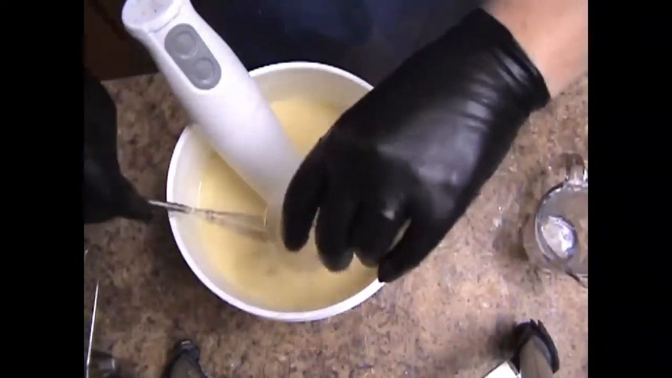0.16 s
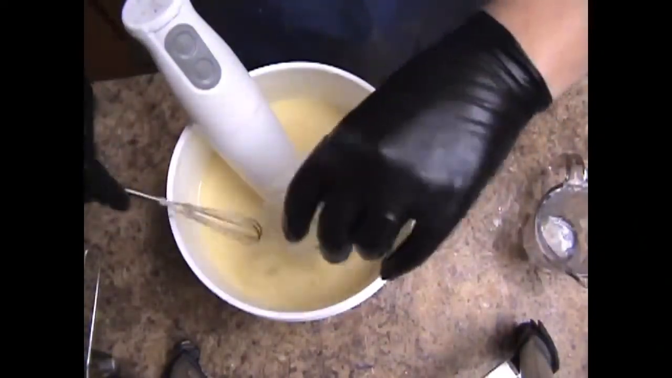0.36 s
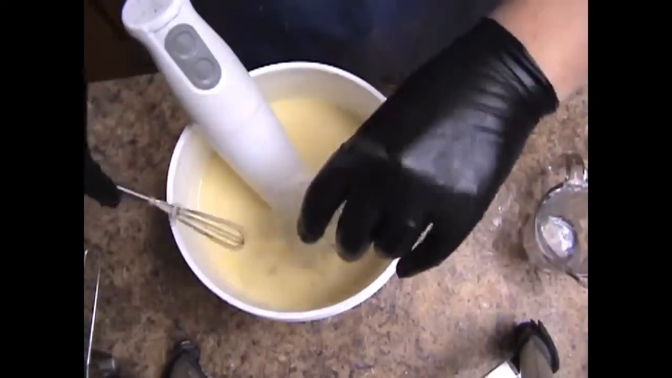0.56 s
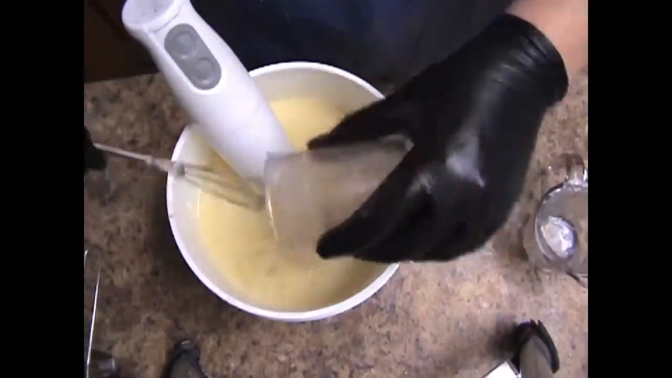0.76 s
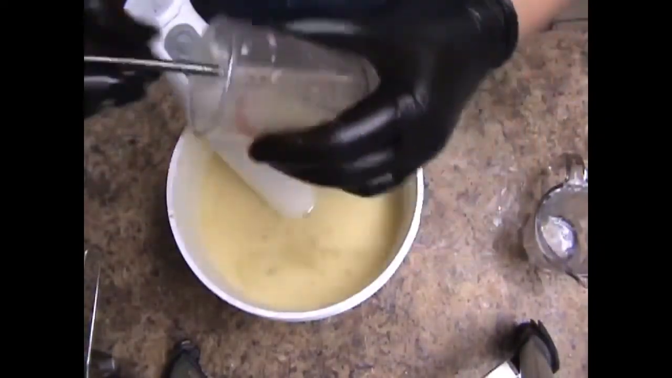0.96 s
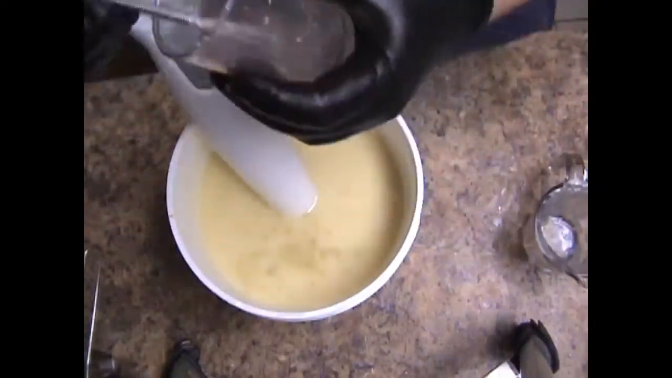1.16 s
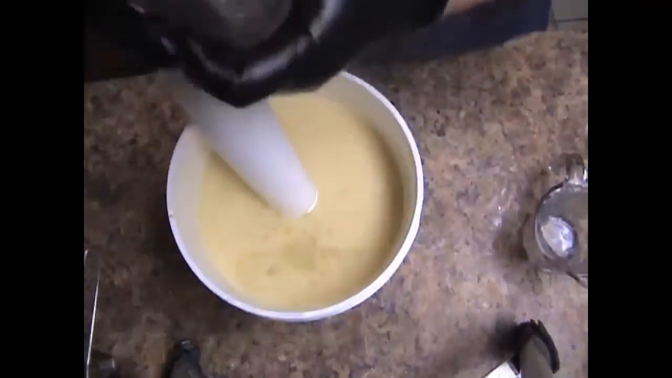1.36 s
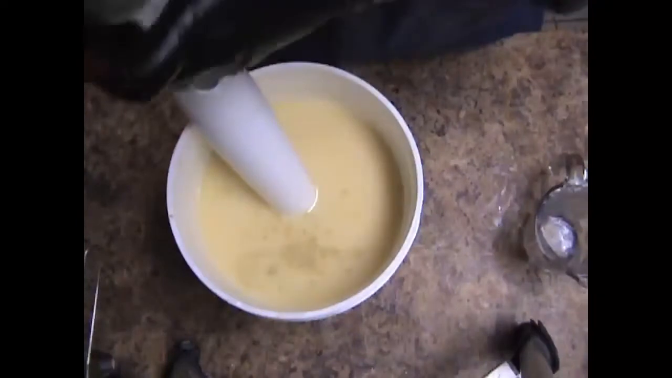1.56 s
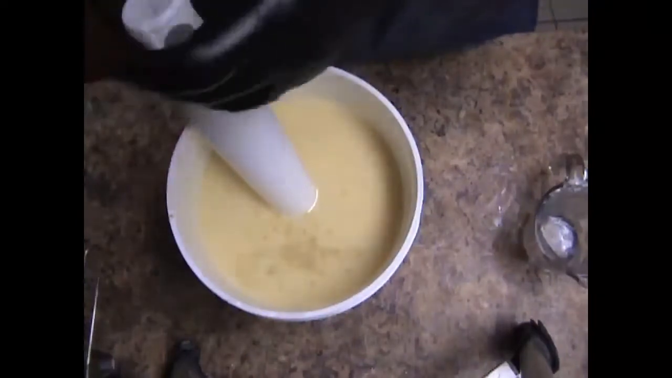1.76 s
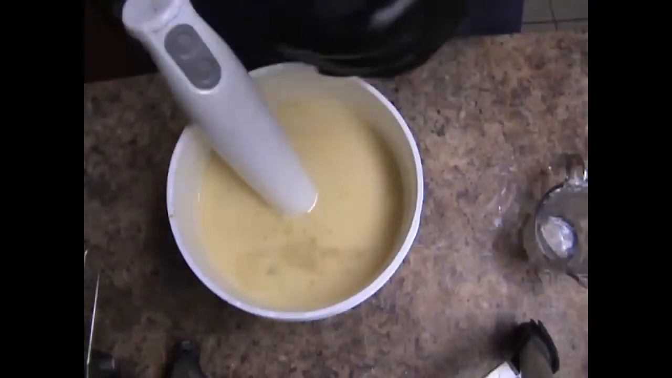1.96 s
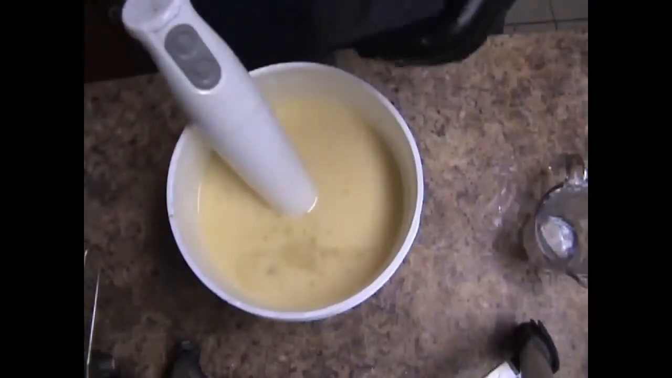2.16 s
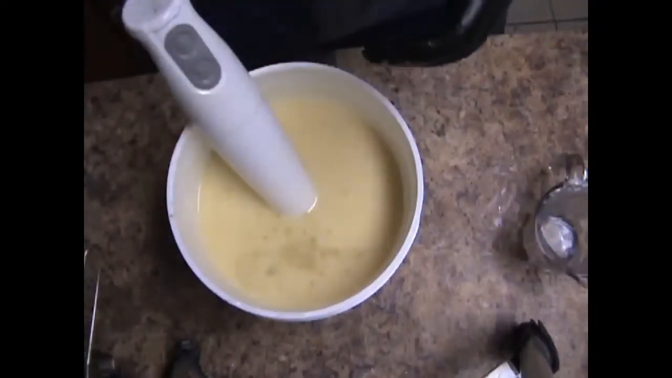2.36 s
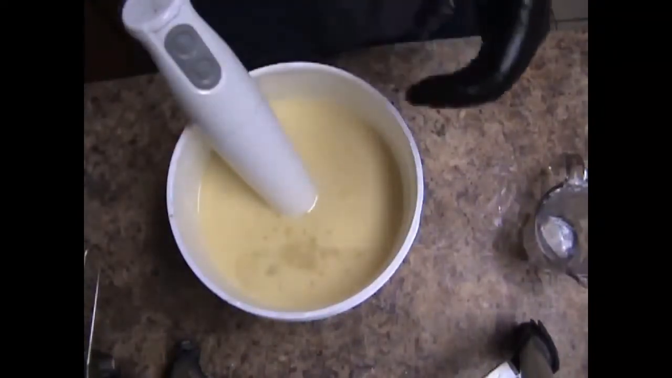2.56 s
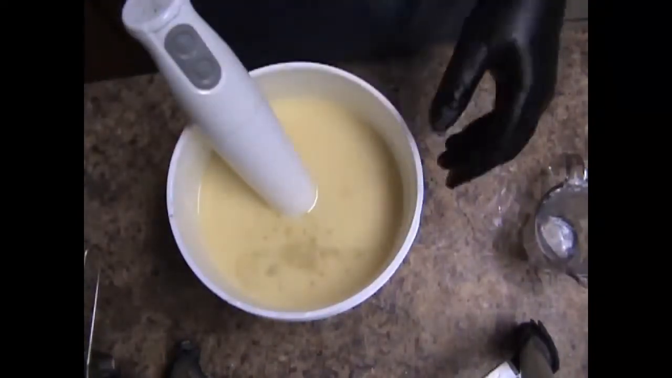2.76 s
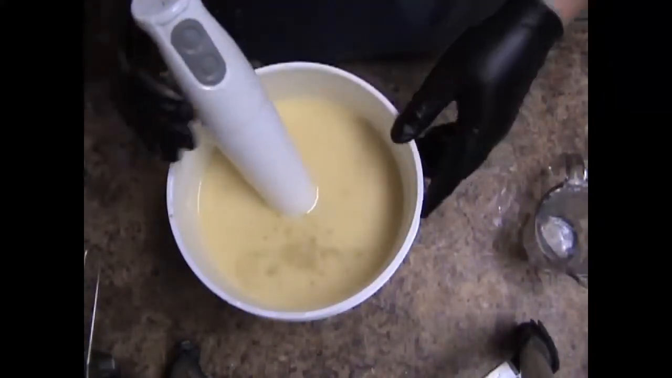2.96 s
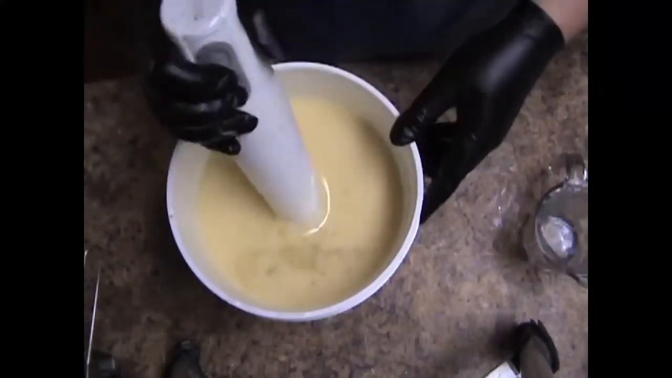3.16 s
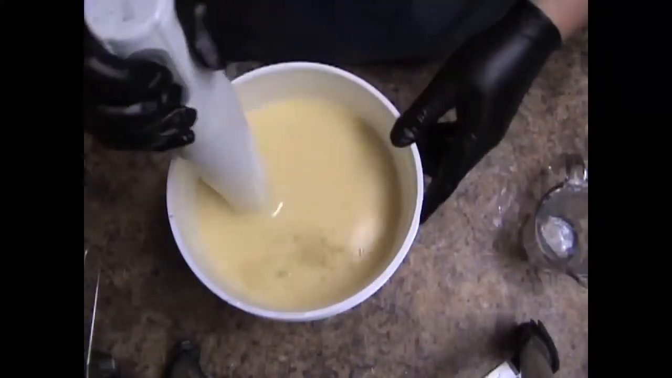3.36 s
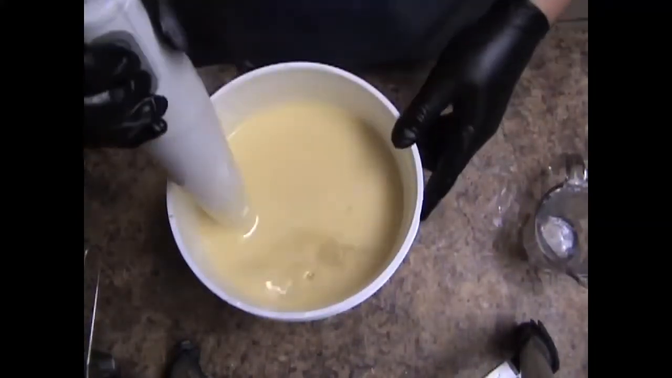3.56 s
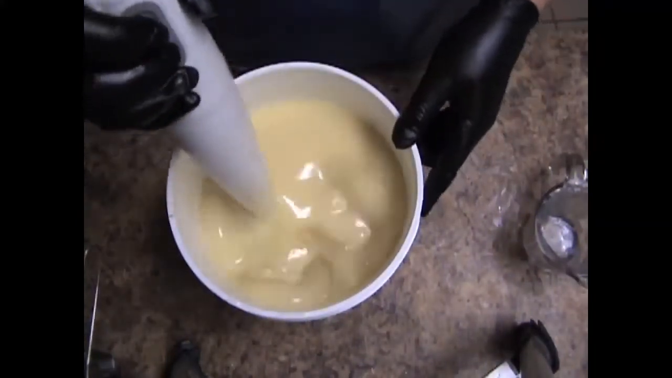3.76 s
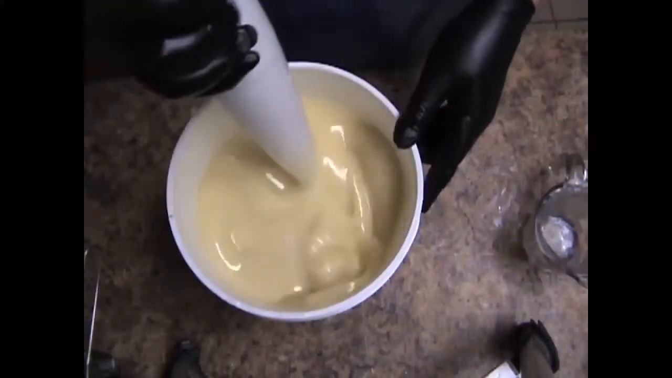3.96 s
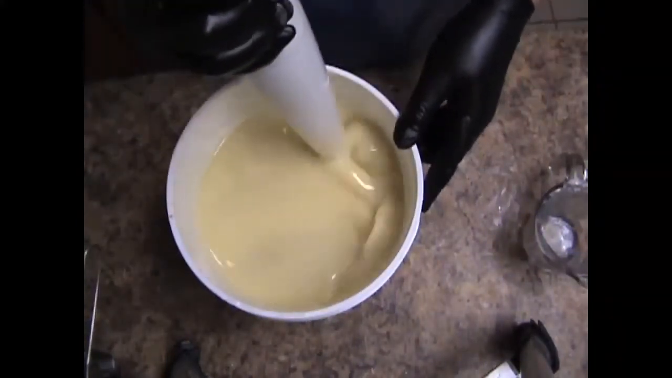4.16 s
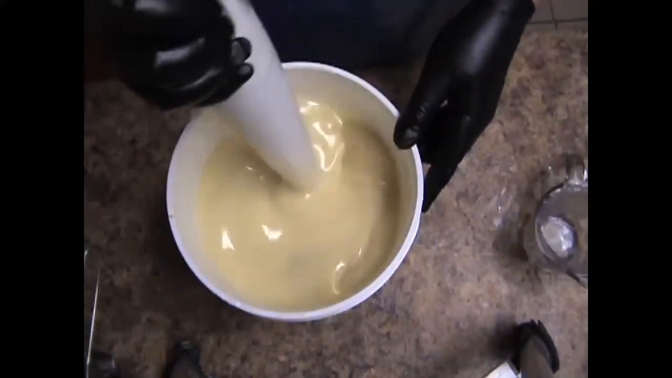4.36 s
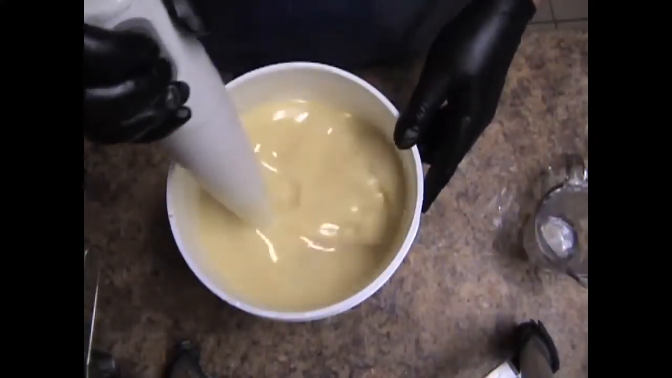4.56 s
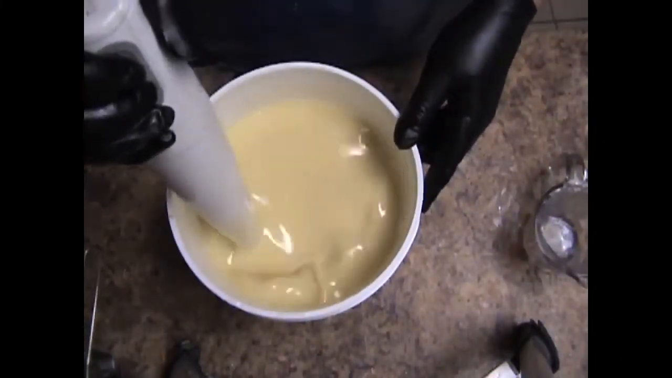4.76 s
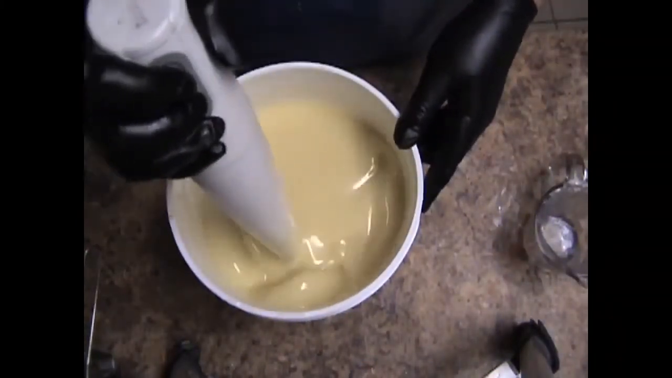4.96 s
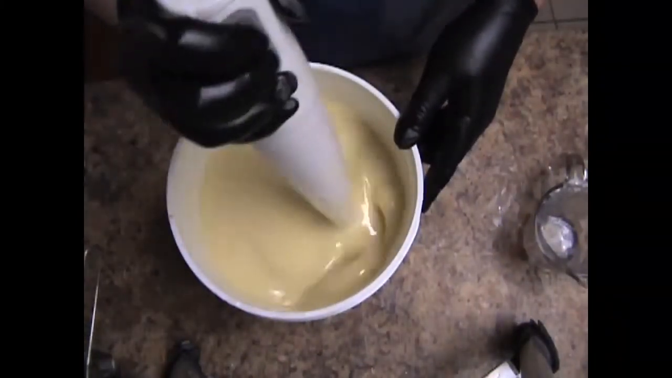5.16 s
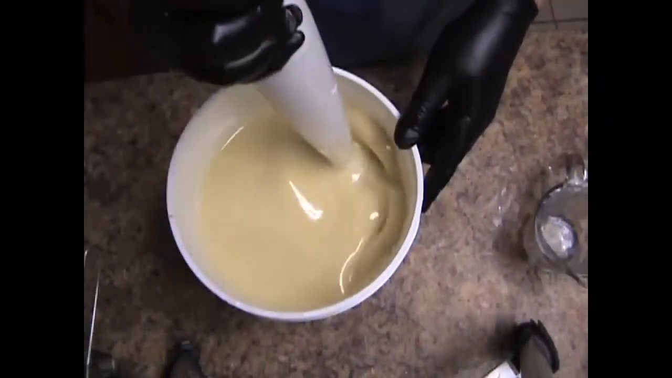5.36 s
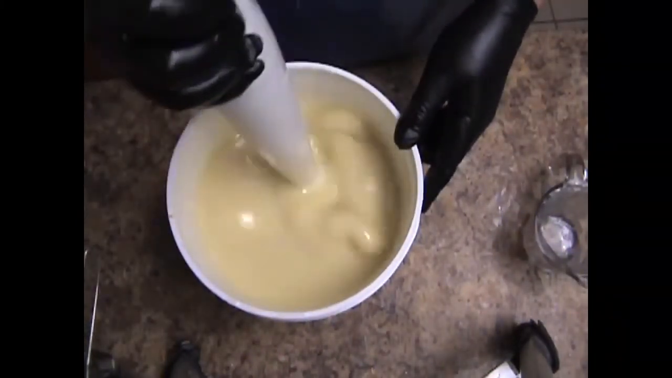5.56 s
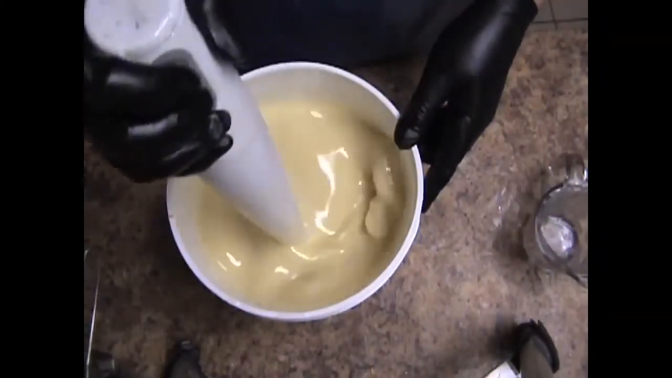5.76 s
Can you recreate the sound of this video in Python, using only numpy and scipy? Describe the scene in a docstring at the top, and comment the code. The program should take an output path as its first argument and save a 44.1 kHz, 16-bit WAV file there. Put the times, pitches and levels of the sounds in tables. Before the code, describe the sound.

A wire whisk taps and clinks on a plastic cup, the cup thuds down, then a stick blender whirs continuously through thick batter.

```python
"""A stick blender runs up and whirs in a bowl of batter: tones locked to its shaft, noise gated by shaft and mains,
and knocks of the coupling. Before it, a wire whisk is rapped on a plastic cup and clinks, and the cup is set
down on the counter: each blow is a set of dying notes with a burst of noise and a kitchen echo.
Gloved hands rustle, as shaped noise, in a quiet kitchen with a humming appliance, heard at two microphone ports."""
import sys
import numpy as np
from scipy import signal
from scipy.fft import rfft, irfft, next_fast_len
from scipy.io import wavfile
from scipy.ndimage import uniform_filter1d, map_coordinates

SR = 44100
rng = np.random.default_rng(int(sys.argv[2]) if len(sys.argv) > 2 else 0)


def master(y):
    """Save y as 16-bit WAV."""
    cut = np.clip(np.atleast_2d(y).T, -1, 1)
    pcm = np.round(cut * 32767)  # scale
    wavfile.write(sys.argv[1], SR, pcm.astype(np.int16))


N = 256220
TIME = np.arange(N) / SR  # seconds


def amp(db):
    """Turns decibels into gain."""
    return 10 ** (np.asarray(db) / 20)


def unit(x):
    """Scales a sound to an rms of 1."""
    return x / np.sqrt(np.mean(x ** 2) + 1e-20)


def along(points, hz):
    """Reads (pitch_hz, value) points on a log pitch axis."""
    f, v = np.transpose(points)
    return np.interp(np.log(hz + 1), np.log(f + 1), v)


def curves(rows):
    """Joins the rows of a table into one smooth-running value per sample for each column after the time."""
    s, *columns = np.transpose(rows)
    return [np.interp(TIME, s, column) for column in columns]


def wobble(rate):
    """A smooth random curve with rate random knots a second."""
    knots = rng.standard_normal(int(N * rate / SR) + 4)
    return map_coordinates(knots, [TIME * rate])


def noise(*shape):
    """White noise."""
    return rng.standard_normal(shape)


def filtered(x, response):
    """Multiplies the spectrum of x by a complex response of frequency."""
    n = x.shape[-1]
    m = next_fast_len(n + 8192)
    return irfft(rfft(x, m) * response(np.fft.rfftfreq(m, 1 / SR)), m)[..., :n]


def coloured(x, spectrum):
    """Shapes x with a spectrum and scales it to an rms of 1."""
    return unit(filtered(x, lambda hz: amp(along(spectrum, hz))))


# how alike sound from all around is at the two ports: pitch_hz, likeness (0 to 1)
LIKENESS = [(60, 0.99), (130, 0.94), (290, 0.81), (640, 0.38), (1410, 0.49), (3100, 0.57), (6820, 0.73),
            (15000, 1)]


def diffuse(pair):
    """Mixes two unrelated signals so they are as alike as sound arriving from all around."""
    def mid_and_side(hz):
        turn = np.arccos(np.clip(along(LIKENESS, hz), -1, 1)) / 2
        return np.array([np.cos(turn), np.sin(turn)])
    mid, side = filtered(pair, mid_and_side)
    return np.array([mid + side, mid - side])


def all_around(spectrum):
    """Shaped noise that arrives from all around, at an rms of 1."""
    return unit(diffuse(coloured(noise(2, N), spectrum)))


# how far the left port leads for direct sound: pitch_hz, lead_radians
LEFT_LEAD = [(0, 0), (340, 0.49), (780, 0.99), (3620, 0.39), (5000, 0.45), (7060, 0.037), (15800, 0.0)]


def ports(x):
    """Direct sound reaches the left port ahead in phase."""
    def lead_and_lag(hz):
        half = np.exp(.5j * along(LEFT_LEAD, hz))
        return np.array([half, 1 / half])
    return filtered(x, lead_and_lag)


def ring(modes, t, rough):
    """Struck things ring at several pitches that die away; rough (radians a sample) lets the phase wander."""
    total = np.zeros(len(t))
    for hz, db, t60 in modes:
        drift = rough * np.cumsum(noise(len(t)))
        strength = amp(db + rng.normal(0, 0.77) - 60 * t / t60)  # each blow differs a little
        total += strength * np.sin(2 * np.pi * hz * t + drift)
    return (1 - np.exp(-t / 0.00084)) * total


def crack(spectrum, t, t60):
    """The short burst of noise when two things touch."""
    return coloured(noise(len(t)), spectrum) * amp(-60 * t / t60) * (1 - np.exp(-t / 0.00094))


# how long the kitchen echo takes to fall by 60 dB: pitch_hz, t60_s
ECHO = [(150, 0.21), (600, 0.37), (2000, 0.28), (6000, 0.32), (14000, 0.31)]
AHEAD, ECHO_START = 64, 320  # samples of silence before a blow, and from the same start to its echo


def add(out, s, blow, pan_db, room_db, low_hz):
    """Places one blow, weakened below low_hz, with a fresh kitchen echo in the broad colour of the blow."""
    blow = filtered(np.pad(blow, (AHEAD, 0)), lambda hz: (1j * hz / (low_hz + 1j * hz)) ** 3)
    n = len(blow)
    hz, t, z = signal.stft(noise(2, n), SR, nperseg=256)
    fading = z * amp(-60 * t / along(ECHO, hz)[:, None])
    tail = signal.istft(fading, SR, nperseg=256)[1]
    tail = diffuse(tail) / np.linalg.norm(tail[0])
    tail = np.pad(tail, ((0, 0), (ECHO_START, 0)))[:, :n]
    power = uniform_filter1d(np.abs(rfft(blow)) ** 2, size=n // 85)
    echo = irfft(rfft(tail, n) * np.sqrt(np.abs(power)), n)
    left_db = pan_db / 2 - .9  # so a pan of 1.8 dB is even
    both = ports(blow) * amp([[left_db], [-left_db]]) + amp(room_db) * echo[:, :n]
    k = max(round(s * SR) - AHEAD, 0)
    out[:, k:k + n] += both[:, :out.shape[1] - k]


def blow_time(length_s=.5):
    """An empty two-port track, and the seconds since the start of a blow."""
    return np.zeros((2, N)), np.arange(int(SR * length_s)) / SR


# colour of the still room: pitch_hz, level_db
AIR = [(15, -37), (25, -9), (129, -13), (173, -1.5), (289, -4.5), (349, 6), (482, 2), (703, -14), (782, -1),
       (1240, -15), (2490, -21), (3720, -32), (15500, -14)]


def room_air():
    """The still room is a faint steady noise from all around."""
    return amp(-68) * all_around(AIR)


# steady tones of an appliance: pitch_hz, level_db (before 1.5 dB is added)
HUM = [(59.2, -66.5), (118.4, -70.5), (209.9, -78.5), (296.1, -67.5), (532.9, -74.5)]


def appliance_hum():
    """A running appliance hums at a few steady pitches whose levels drift."""
    lines = [amp(db + 1.5 + 1.7 * wobble(2.5)) * np.sin(2 * np.pi * hz * TIME) for hz, db in HUM]
    lines[1] *= 1 + 0.53 * np.cos(2 * np.pi * 2.08 * (TIME - 1.54))  # wavers twice a second
    return ports(sum(lines))


def swell(middle_s, length_s, db):
    """A bell-shaped rise and fall in level."""
    return amp(db) * np.exp(-(2 * (TIME - middle_s) / length_s) ** 2)


# hands moving: start_s, gloves_db, sleeves_db
HAND_MOVES = [(0.0, -67, -65), (0.23, -73, -69.5), (0.44, -70, -69), (0.59, -74, -77), (0.77, -70.5, -67.5),
              (1.08, -67.5, -65), (1.25, -64.5, -59.5), (1.47, -61.5, -60.5), (1.71, -65.5, -63),
              (2.26, -65, -60.5), (2.36, -65, -65), (2.46, -75.5, -72), (2.67, -66.5, -70.5),
              (2.79, -63, -62), (2.96, -61, -62), (3.09, -58.5, -59), (3.24, -61, -61.5), (3.39, -69, -67)]
# colour of the rubbing gloves: pitch_hz, level_db
GLOVES = [(1760, -27), (3000, -11), (3540, -4), (4320, 0.5), (9520, -8), (14500, -22), (15500, -32)]
# colour of the rubbing sleeves: pitch_hz, level_db
SLEEVES = [(350, -45), (600, -9.5), (905, -13.5), (1260, -6), (3000, -12.5), (3900, -25), (6600, -120)]
# one brighter swish of a glove: middle_s, length_s, level_db
SWISH = (1.62, 0.038, -54.5)


def rustling_hands():
    """Rubbing gloves and sleeves make shaped noise whose level flutters."""
    gloves_db, sleeves_db = curves(HAND_MOVES)
    gloves = (amp(gloves_db + 1.17 * wobble(60)) + swell(*SWISH)) * all_around(GLOVES)
    sleeves = amp(sleeves_db + 1.34 * wobble(39.57)) * all_around(SLEEVES)
    return gloves + sleeves


# low bumps through the counter: middle_s, length_s, level_db
BUMPS = [(.07, 0.25, -77), (.58, 0.11, -76), (1.69, 0.13, -71), (3.05, .04, -62), (3.093, .04, -55),
         (3.155, 0.063, -60), (3.24, .06, -67), (5.054, 0.095, -58)]


def counter_sounds():
    """Low bumps come through the counter, and scuffing on it is dull noise of uneven level."""
    low = all_around([(15, -11), (30, -8), (90, -6), (250, -21), (16000, -120)])
    bumps = sum(swell(*row) for row in BUMPS) * low
    dull = all_around([(60, -16), (150, 0.5), (450, -1.0), (1200, -12), (16000, -120)])
    scuff_db = -65 + 1.9 * wobble(50) + 9 * np.tanh(wobble(11))
    return bumps + amp(scuff_db) * dull


# whisk clinks: start_s, contact_db, hollow_db, low_wires_db, high_wires_db (before the gains below)
CLINKS = [(1.0281, -23, -24.5, -29, -43), (1.043, -11, -35, -23.5, -15), (1.069, -26, -38, -31, -18),
          (1.107, -38, -66, -42.5, -49), (1.1965, -12.5, -53, -24, -14), (1.264, -51, -55, -43, -70),
          (1.2984, -41, -62, -41, -62), (1.3366, -11.5, -44, -24, -16.5), (1.412, -44, -74, -46, -62)]
# ringing wires of the whisk, the first three being the low ones: pitch_hz, level_db, t60_s
WIRES = [(2420, -9.5, 0.082), (4146, -1.5, 0.034), (5810, -6, 0.074), (7020, -14, 0.039),
         (7450, -13, 0.038), (8890, 3, 0.018), (9400, -4, .02), (10440, -8, 0.037), (10760, -3, 0.024)]
# hollow note under a clink: pitch_hz, level_db, t60_s
HOLLOW = [(908, 5, 0.053), (850, -27, .05)]
# colour of the contact: pitch_hz, level_db
CLINK_NOISE = [(180, -49), (300, -6.5), (849, -17), (1700, -26), (2320, -9.5), (5850, -0.5), (7750, -4),
               (10800, -4), (15500, -35)]


def whisk_clinks():
    """The thin wires ring high and briefly over a contact burst and a hollow note."""
    out, t = blow_time()
    # an earlier clink is still dying away at the start
    dying = [(hz, db, 0.99 * t60) for hz, db, t60 in WIRES]
    add(out, 0, amp(-51) * ring(dying, t, 0.044), 0, room_db=2.5, low_hz=188)
    for s, db, hollow_db, low_db, high_db in CLINKS:
        blow = amp(low_db - 3.5) * ring(WIRES[:3], t, 0.081)
        blow += amp(high_db - 8) * ring(WIRES[3:], t, 0.15)
        blow += amp(db - 4) * crack(CLINK_NOISE, t, 0.01)
        blow += amp(hollow_db) * ring(HOLLOW, t, 0.039)
        add(out, s, blow, pan_db=2, room_db=-19, low_hz=200)
    return out


# small contacts of gloves on bowl and handle, the last (3.387 s) being the click of the blender's switch:
# start_s, level_db (before the gains below), pan_db, pitch_hz
TOUCHES = [(.12, -50, -1, 3000), (0.929, -49, 1, 3000), (1.005, -47, 1, 4000), (1.43, -40, 0, 6500),
           (2.175, -33, 8, 5600), (2.841, -41, -2, 4100), (2.909, -33, -3, 1160), (2.921, -34.5, 3, 695),
           (3.014, -37, 2, 384), (3.016, -34.5, -1, 1200), (3.045, -53, -1, 300), (3.08, -38.5, 0, 278),
           (3.097, -41, 2, 220), (3.175, -54, 1, 220), (3.387, -32, 3, 393)]


def small_touches():
    """A light contact is a tick of noise around one pitch with a brief note at it."""
    out, t = blow_time(.2)
    for s, db, pan_db, hz in TOUCHES:
        around = [(hz / 4, -25), (hz, 0), (hz * 1.34, -6), (hz * 4, -30), (80000, -70)]
        blow = amp(db - 3) * crack(around, t, 0.009 + 5 / hz)
        blow += amp(db - 0.5) * ring([(hz, 0, 5 / hz)], t, 0.029)
        add(out, s, blow, pan_db, room_db=-5, low_hz=71)
    return out


# whisk on cup: start_s, cup_db (before the gains below), pan_db, cup_air_db, handle_db, counter_db
RAPS = [(.396, -11, 3, -36.5, -57, -73), (.41, -20, 1, -35.5, -52, -44), (.547, -14.5, 3.5, -38, -62, -45),
        (.56, -24.5, 2, -39, -51.5, -50), (.692, -11.5, 3.5, -67, -68, -39), (.708, -30, 0, -44, -66, -43)]
# ringing wall of the cup: pitch_hz, level_db, t60_s
CUP = [(1232, -5.5, 0.067), (1932, 1, 0.047), (2320, 1.5, 0.028), (2750, -5.5, 0.032), (3340, -1.5, 0.034),
       (4280, -15, 0.033), (7300, -2, 0.017)]
# colour of the contact: pitch_hz, level_db
RAP_NOISE = [(35, -48), (60, -27), (423, -5), (1230, -11.5), (1520, -24), (1960, -2), (2840, -10.5),
             (3270, -13), (3840, -16.5), (4220, -8.5), (7030, -19.5), (9080, -16), (15500, -40)]
# ringing air in the cup: pitch_hz, level_db, t60_s
CUP_AIR = [(540, -4.5, 0.34), (494, -6.5, 0.2), (647, -14, 0.24), (759, 2.5, 0.12), (259, -7.5, 0.1)]
# ringing handle: pitch_hz, level_db, t60_s
HANDLE = [(1530, 1, 0.43)]
# low notes of the counter: pitch_hz, level_db, t60_s
SLAB = [(61, -9, 0.28), (95, -4.5, 0.12)]


def whisk_raps():
    """A rap sets the cup wall, its air, the handle and the counter ringing, with a burst at the contact."""
    out, t = blow_time()
    for s, db, pan_db, air_db, handle_db, slab_db in RAPS:
        blow = amp(db - 14) * ring(CUP, t, 0.065)
        blow += amp(db - 4) * crack(RAP_NOISE, t, 0.023)
        blow += amp(air_db) * ring(CUP_AIR, t, 0.052)
        blow += amp(handle_db) * ring(HANDLE, t, 0.064)
        blow += amp(slab_db) * ring(SLAB, t, 0.0044)
        add(out, s, blow, pan_db, room_db=-14, low_hz=30.5)
    return out


# cup on the counter: start_s, level_db (before the gains below), pan_db
SET_DOWN = [(2.294, -8.5, 3.5)]
# ringing counter: pitch_hz, level_db, t60_s
COUNTER = [(477, -5.5, 0.38), (502, -5.5, 0.36), (613, -8, 0.35), (640, -3, 0.16), (800, -22, 0.089),
           (962, -3, 0.11), (1117, 6, 0.051), (1320, 3, 0.07), (1620, -25, 0.076), (1880, -1.5, 0.06),
           (2070, -14, 0.046), (3270, -25, 0.028), (176, -13, 0.099)]
# colour of the thud: pitch_hz, level_db
THUD = [(47, -52), (80, -30), (205, -42), (363, -17), (574, 4.5), (852, -14), (1870, -11), (2380, -13),
        (4500, -29.5), (7280, -33), (15000, -65)]


def cup_set_down():
    """The cup thuds on the counter, which rings on."""
    out, t = blow_time()
    for s, db, pan_db in SET_DOWN:
        blow = amp(db - 14.5) * ring(COUNTER, t, 0.029) + amp(db - 8.5) * crack(THUD, t, 0.052)
        add(out, s, blow, pan_db, room_db=-5, low_hz=201)
    return out


# full running speed in the batter: start_s, turns_per_s
SPEED = [(3.8, 195.6), (4, 195), (4.3, 195.2), (4.45, 195.6), (5, 195.6), (5.6, 195.2), (5.81, 194.5)]
SWITCH_S = 3.4
RUN_UP_S, RUN_UP_SHAPE, START_LAG = .0934, 1.4, 90  # seconds, exponent, turns a second short at the switch


def shaft_turning():
    """The shaft lags full speed at the switch and catches up; gives its angle and its slack (share missing)."""
    since = np.clip(TIME - SWITCH_S, 0, None)
    full, = curves(SPEED)
    speed = full - START_LAG * np.exp(-(since / RUN_UP_S) ** RUN_UP_SHAPE)
    angle = 2 * np.pi * np.cumsum(speed + .5 * wobble(30)) / SR
    return angle, 1 - speed / full


# one row per shaft order (multiple of the shaft speed) from the first; the side tones get 2 dB more:
# own_db (unused where it swells), one_beat_below_db, one_beat_above_db, two_beats_above_db
ORDERS = [(-61, -75, -58, -54), (-38, -67, -45, -52), (-41, -52, -52, -58), (-36, -55, -60, -60),
          (-52, -62, -61, -54), (-48, -66, -49, -53), (-37, -53, -48, -62), (-46, -50, -56, -60),
          (-44, -52, -47, -59), (-44, -58, -58, -58), (-51, -55, -46, -49), (-53, -55, -57, -59),
          (-44, -52, -49, -59), (-46, -61, -55, -57), (-48, -55, -55, -57), (-56, -56, -59, -63),
          (-52, -58, -54, -63)]


def shaft_tones(shaft, slack, mains, lean):
    """Tones at multiples of the shaft speed, each with side tones spaced by the torque pulses."""
    tones = np.zeros(N)
    for k, (own_db, *side_db) in enumerate(ORDERS, 1):
        loss_db = (40 + 12 * k) * slack  # below full speed the orders are weaker, the higher ones more so
        if k in lean:
            level_db = lean[k] - 90 * slack
        else:
            level_db = own_db + 5 * np.tanh(wobble(10)) - loss_db
        tones += np.sqrt(2) * amp(level_db) * np.sin(k * shaft + rng.uniform(0, 2 * np.pi))
        for m, db in zip((-1, 1, 2), side_db):
            level_db = db + 2 + 2.8 * np.tanh(wobble(7)) - loss_db
            tones += amp(level_db) * np.sin(k * shaft + m * mains + rng.uniform(0, 2 * np.pi))
    return tones


# load on the motor: start_s, rattle_db, housing_over_rattle_db (before 3.5 dB is taken off)
LOAD = [(3.41, -46, 10), (3.44, -47.5, 10), (3.48, -42.5, 7), (3.78, -36.5, 2.5), (3.97, -37.5, 3.5),
        (4.42, -37, 4.5), (4.97, -36, 4.5), (5.3, -34, 0), (5.43, -36.5, 0), (5.47, -35, 3.5),
        (5.8, -34.5, 6.5), (5.81, -34, -3)]
# housing resonance that moves with the grip: start_s, pitch_hz, level_db
WHINE = [(3.4, 2447, -47), (3.7, 2575, -36), (4, 2578, -40), (4.3, 2586, -61), (4.6, 2617, -36.5),
         (4.8, 2599, -34), (4.95, 2546, -32), (5.1, 2411, -33), (5.28, 2249, -34.5), (5.36, 2751, -38),
         (5.55, 3046, -38.5), (5.65, 2710, -54), (5.81, 2545, -37)]
# colour of the foot's rattle: pitch_hz, level_db
FOOT = [(120, -41), (200, -26), (265, -18.5), (388, 0), (455, -8.5), (508, -7.5), (673, -3), (775, 4),
        (857, -1.5), (1070, -5.5), (1350, 2), (1630, -3.5), (2200, -2.5), (2860, -36), (4840, -120)]
# colour of the housing's rattle: pitch_hz, level_db
HOUSING = [(1000, -33), (1700, -10), (1940, 6), (2050, -8), (2480, 4), (3480, -5), (3800, -2), (4940, -55),
           (8360, -120)]
# colour of the fan and brushes: pitch_hz, level_db
FAN = [(1880, -28), (3200, -3), (3600, -6.5), (4420, -1.5), (6070, -10.5), (7210, -12.5), (10700, -19),
       (13900, -29), (14600, -43), (15500, -49)]
STEM_HZ, STEM_DB, STEM_FLUTTER_DB, STEM_SLACK_DB = 1431, -7.5, 3, 16  # it shakes more below full speed
GATE_GRIP = .9  # how hard the gate grips the resonances (exponent)


def motor_rattle(shaft, slack, mains, lean):
    """Shaft and torque pulses gate the noise of foot, housing, fan and stem; gives direct and scattered sound."""
    load_db, housing_db = curves(LOAD)
    whine_hz, whine_db = curves(WHINE)
    gate_db = 4 * np.cos(mains) + 3.35 * np.cos(shaft) + 6 * np.cos(2 * shaft + 1)
    gate = amp(gate_db + 2.6 * np.tanh(wobble(300) / 2))  # pulses scatter in strength

    def shake(spectrum, grip):
        return coloured(gate ** grip * noise(N), spectrum)

    def narrow(hz, width_hz):
        carrier = np.exp(2j * np.pi * np.cumsum(hz) / SR)
        band = (wobble(width_hz) + 1j * wobble(width_hz)) * carrier
        return unit(gate ** GATE_GRIP * band.real)

    # the foot follows the second order a little
    foot_db = -1 + .14 * (lean[2] - lean[2][-1]) + 0.5 * wobble(16)
    stem_db = STEM_DB + STEM_SLACK_DB * np.tanh(8 * slack) + STEM_FLUTTER_DB * np.tanh(wobble(9))
    rattle = amp(foot_db) * shake(FOOT, 0.89)
    rattle += amp(housing_db - 3.5 + wobble(7.4)) * shake(HOUSING, 1.45)
    rattle += shake(FAN, 0.37)
    rattle += amp(stem_db) * narrow(np.full(N, STEM_HZ), 180)
    whine = amp(whine_db) * narrow(whine_hz, 420)
    whine += amp(whine_db - 8) * narrow(whine_hz * .3 + 3500, 500)
    scattered = amp(load_db - 12.5) * coloured(noise(2, N), FOOT + FAN[1:])  # off bowl and counter
    return amp(load_db) * rattle + whine, scattered


# shaft orders that swell
SWELLING = (2, 3, 4, 7)
# their levels as the foot leans on the bowl: start_s, second_db, third_db, fourth_db, seventh_db
LEAN = [(3.64, -57, -50, -40.5, -47), (3.73, -50.5, -55, -43, -42), (3.85, -46, -60, -40, -41.5),
        (4.04, -51, -46, -33.5, -32.5), (4.21, -42, -42.5, -39, -37.5), (4.3, -34.5, -47, -50, -32),
        (4.42, -42.5, -42.5, -33, -32), (4.65, -41.5, -50, -32, -36.5), (4.79, -56, -52, -45, -44),
        (4.84, -43.5, -43, -45, -53), (4.91, -38, -49, -34, -36), (5.02, -41, -50, -47, -51),
        (5.09, -57, -46, -36.5, -39), (5.18, -47, -45, -37, -52), (5.42, -28, -28, -30.5, -35.5),
        (5.51, -29, -43, -43, -40), (5.64, -47.5, -41, -30, -32.5), (5.81, -46.5, -45, -30.5, -36)]
BEAT_HZ = 119.6  # the torque pulses twice per mains cycle


def blender():
    """The motor sends out shaft tones and gated rattle, with some noise scattered off bowl and counter."""
    shaft, slack = shaft_turning()
    mains = 2 * np.pi * BEAT_HZ * TIME
    lean = dict(zip(SWELLING, curves(LEAN)))
    tones = shaft_tones(shaft, slack, mains, lean)
    rattle, scattered = motor_rattle(shaft, slack, mains, lean)
    running = np.clip((TIME - SWITCH_S) / 0.0018, 0, 1)
    return running * (ports(tones + rattle) + diffuse(scattered))


# coupling knocks in the run-up and foot taps on the bowl: start_s, foot_db, bowl_db (before the gains below)
KNOCKS = [(3.4008, -13.5, -30), (3.4085, -15.5, -23.5), (3.418, -27, -29), (3.4346, -17, -30.5),
          (3.467, -15, -34), (3.4859, -12, -34), (3.5105, -9.5, -31), (3.5454, -13, -54),
          (3.5613, -17, -34), (3.5756, -6.5, -42), (3.617, -10, -51), (3.652, -26, -54), (3.6842, -10, -38),
          (3.7068, -17, -27), (3.725, -8.5, -39), (4.1409, -10, -24.5), (4.2474, -35, -30),
          (5.345, -27, -22), (5.3701, -29, -25)]
# ringing foot: pitch_hz, level_db, t60_s
FOOT_MODES = [(1402, 2, 0.026), (2280, 2.5, 0.021), (2760, -1, 0.014), (4000, -5, 0.025),
              (5000, -25, 0.014)]
# ringing bowl: pitch_hz, level_db, t60_s
BOWL = [(962, 0.5, 0.061), (600, -15, 0.11), (467, -5.5, 0.13), (713, -26, 0.025)]


def coupling_knocks():
    """The coupling knocks as the motor takes up speed and the foot taps the bowl, so foot and bowl ring."""
    out, t = blow_time()
    for s, db, bowl_db in KNOCKS:
        blow = amp(db - 13.5) * ring(FOOT_MODES, t, 0.054)
        blow += amp(db - 20) * crack(HOUSING[:-2] + FAN[3:], t, 0.021)
        blow += amp(bowl_db - 1) * ring(BOWL, t, 0.082)
        add(out, s, blow, pan_db=.8, room_db=-7, low_hz=250)
    return out


def scene():
    """All sources at the two ports."""
    quiet = room_air() + appliance_hum() + rustling_hands() + counter_sounds()
    whisk_and_cup = whisk_clinks() + small_touches() + whisk_raps() + cup_set_down()
    return quiet + whisk_and_cup + blender() + coupling_knocks()


# level difference between the ports: pitch_hz, left_over_right_db
TILT = [(60, -2), (110, -2.5), (200, -1.5), (380, -3.5), (700, -2), (1290, -0.5), (2380, 1.5), (4400, 1),
        (8120, 0.5), (15000, 1)]
TOP_HZ = 15000


def record(dry):
    """The two ports differ in tilt, and nothing is kept from TOP_HZ up."""
    def response(hz):
        return amp(np.outer([.5, -.5], along(TILT, hz))) * (hz < TOP_HZ)
    return filtered(dry, response)


dry = scene()
out = record(dry)
master(out)
```